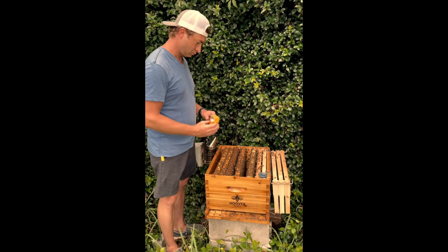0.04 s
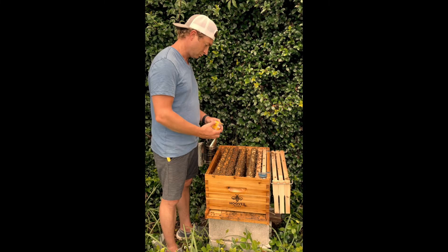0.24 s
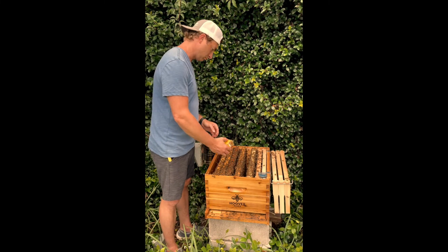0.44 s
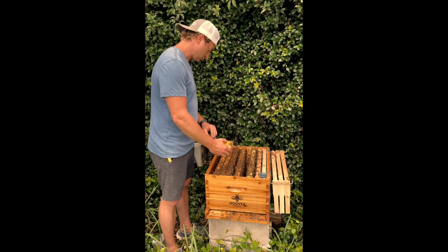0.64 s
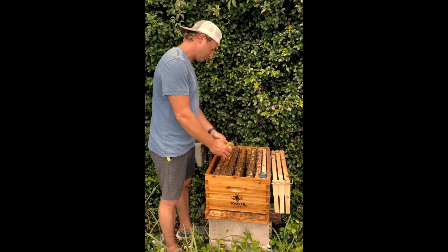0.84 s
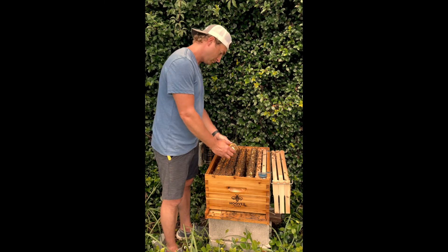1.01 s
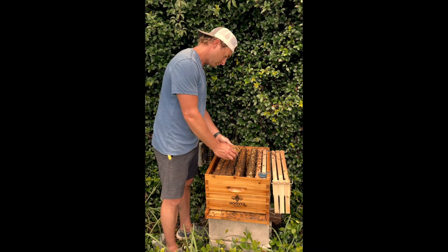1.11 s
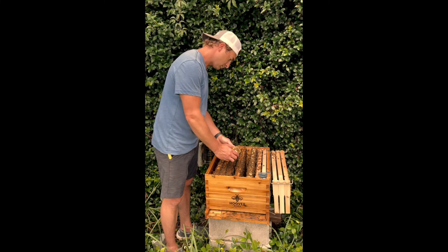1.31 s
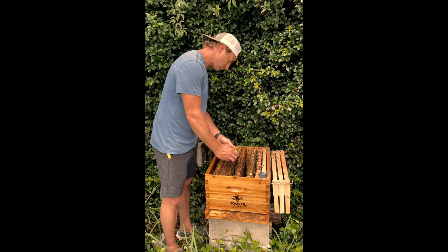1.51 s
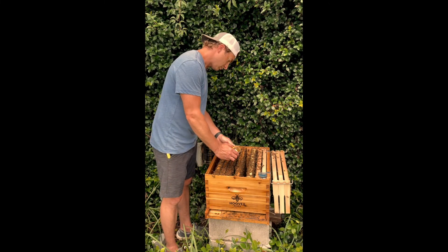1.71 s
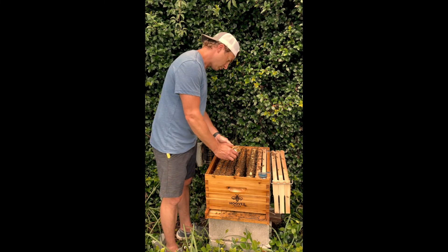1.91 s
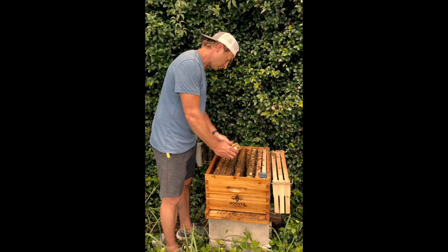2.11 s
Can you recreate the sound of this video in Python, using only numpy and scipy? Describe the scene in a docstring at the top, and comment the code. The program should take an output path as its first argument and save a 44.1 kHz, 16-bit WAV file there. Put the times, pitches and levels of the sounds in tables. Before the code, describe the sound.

Honeybees hum at an open hive in a quiet garden. One bee hovers close over the colony's dull murmur while wings rustle to the left. The hum fades under a few soft wooden knocks.

```python
"""An open wooden beehive in a quiet garden. After two tiny ticks the hum of beating wings swells:
one bee hovers close, almost a pure tone, over the dull murmur of the colony's wing strokes.
Others buzz past, and wings rustle to the left in airy noise and papery flurries. The hum slowly
fades, and the wooden frames ring with a soft knock and a few fainter bumps."""
import sys
import numpy as np
from scipy import signal
from scipy.fft import rfft, irfft
from scipy.io import wavfile
from scipy.ndimage import uniform_filter1d

SR = 44100
rng = np.random.default_rng(int(sys.argv[2]) if len(sys.argv) > 2 else 0)


def unload_audio(sound):
    """Save the sound as a 16-bit wav file, at the path given as the first command line argument."""
    columns = np.transpose(np.atleast_2d(sound))
    # keep every value between -1 and 1, then stretch to whole-number steps
    steps = np.round(np.clip(columns, -1, 1) * 32767)
    wavfile.write(sys.argv[1], SR, steps.astype(np.int16))


N = 94815
TIME_S = np.arange(N) / SR
OCTAVES = np.log2(np.maximum(np.fft.rfftfreq(N, 1 / SR), 1))
LEFT_RIGHT = np.array([[1], [-1]])


def undb(db):
    """Decibels to gain."""
    return np.exp(np.asarray(db) * np.log(10) / 20)


def curve(table, column=1):
    """Automation: one column of a table, joined by straight lines in time."""
    rows = np.array(table, float)
    return np.interp(TIME_S, rows[:, 0], rows[:, column])


def walk(rate_hz):
    """Smooth random wandering with a spread of about 1."""
    hold = max(int(SR / rate_hz), 1)
    steps = np.repeat(rng.standard_normal(N // hold + 3), hold)
    start = rng.integers(hold)
    return 1.35 * uniform_filter1d(uniform_filter1d(steps, hold), hold)[start:start + N]


def colour(x, eq):
    """Apply an EQ curve that falls 40 dB an octave beyond its ends; rms 1."""
    hz, db = np.array(eq, float).T
    beyond = np.maximum(np.log2(hz[0]) - OCTAVES, 0) + np.maximum(OCTAVES - np.log2(hz[-1]), 0)
    shaped = irfft(rfft(x) * undb(np.interp(OCTAVES, np.log2(hz), db) - 40 * beyond), N)
    return shaped / np.sqrt(np.mean(shaped ** 2))


def wide_noise(eq, likeness):
    """Coloured stereo noise; likeness is the share of power common to left and right."""
    centre = np.sqrt(likeness) * rng.standard_normal(N)
    sides = np.sqrt(1 - likeness) * rng.standard_normal((2, N))
    return colour(centre + sides, eq)


def tone(hz, harmonics, flutter_db, flutter_hz):
    """Harmonics of one beat rate, each fluttering in level."""
    phase = 2 * np.pi * np.cumsum(hz * np.ones(N)) / SR
    out = 0
    for multiple, db in harmonics:
        gain = undb(db + flutter_db * walk(flutter_hz))
        out = out + gain * np.sin(multiple * phase + 2 * np.pi * rng.random())
    return np.sqrt(2) * out


def ring(start_s, t60_s, rise_s):
    """Envelope of something struck: a short rise and a free decay."""
    age = np.maximum(TIME_S - start_s, 0)
    return np.minimum(age / rise_s, 1) * undb(-60 * np.maximum(age - rise_s, 0) / t60_s)


def split(x, hz):
    """Crossover: the parts below and above a frequency."""
    filters = [signal.butter(2, hz, side, fs=SR, output="sos") for side in ("low", "high")]
    return [signal.sosfilt(np.tile(sos, (2, 1)), x) for sos in filters]


# Tone of the garden bed: freq_hz, gain_db
GARDEN_EQ = [(250, -9.5), (600, 16.5), (1300, -8.5), (2100, -1), (2800, -5.5), (3700, -5.5), (4900, -24),
             (5700, -3.5), (8000, -14), (8700, -15), (13000, -45)]
# Rumble fading away: time_s, level_db
RUMBLE_LEVEL = [(0, -67.5), (.26, -79.5), (.95, -81), (2.15, -99)]
# Its low end: freq_hz, gain_db
RUMBLE_EQ = [(25, -21), (80, -11.5), (160, -11), (300, -22)]
# Shrill that drops out as the hum swells: time_s, level_db
SHRILL_LEVEL = [(0, -78), (.12, -81.5), (.18, -84), (.21, -105)]
# Its narrow peak: freq_hz, gain_db
SHRILL_EQ = [(9500, -26), (10200, -10), (10500, -6), (11100, -1), (11700, -33), (12600, -36)]

def garden():
    """Outdoor ambience: a quiet steady bed, a faint rumble and a thin insect-like shrill."""
    bed = undb(-72.5) * wide_noise(GARDEN_EQ, likeness=0.77)
    rumble = undb(curve(RUMBLE_LEVEL)) * wide_noise(RUMBLE_EQ, likeness=0.98)
    shrill = undb(curve(SHRILL_LEVEL)) * wide_noise(SHRILL_EQ, likeness=0.23)
    return bed + rumble + shrill


# Colony fader, with an opening blip and a hush before the swell: time_s, gain_db
COLONY_LEVEL = [(0, -51.5), (.04, -82), (.185, -77.5), (.215, -57.5), (.255, -46.5), (.37, -56.5),
                (.415, -51), (.46, -51.5), (.7, -52.5), (1.0, -50), (1.12, -51), (1.24, -48.5),
                (1.36, -53.5), (1.41, -48), (1.445, -55.5), (1.475, -50.5), (1.525, -50), (1.55, -54),
                (1.72, -58.5), (1.78, -55.5), (1.83, -54.5), (1.925, -53.5), (1.95, -63.5), (2.15, -57.5)]
# Dull body of the murmur: freq_hz, gain_db
MURMUR_EQ = [(100, -44), (130, -16), (200, -5.5), (280, 5.5), (380, 2.5), (480, -2), (620, -5.5),
             (800, -12), (900, -25), (1150, -55)]
# Low drone under it, before its fade: harmonic, gain_db
DRONE_HARMONICS = [(2, -6.5), (4, -10.5), (5, -13)]
# Bass ride against the mids: time_s, gain_db
BASS_LEVEL = [(0, -37), (.25, -0.5), (.5, 6.5), (.9, 5), (1.55, -1), (1.75, -15)]
# Buzzy upper edge, coming in late: time_s, gain_db
TREBLE_LEVEL = [(.2, -37.5), (.52, -24), (1.3, -28.5), (2.15, -22)]
# Tone of that edge: freq_hz, gain_db
TREBLE_EQ = [(900, -0.5), (1200, -0.5), (1600, 8), (2500, -16)]

def colony(bees=20, wingbeat_hz=209.96, stroke_sharpness=58, drone_hz=113.7, drone_fade_db_per_s=2.5):
    """Many bees, each a train of wing strokes at its own wandering rate, blur into a murmur."""
    wings = 0
    for detune in np.linspace(-.5, .25, bees):
        hz = wingbeat_hz * np.exp(detune + .025 * walk(12))
        phase = 2 * np.pi * (np.cumsum(hz) / SR + rng.random())
        strokes = np.exp(stroke_sharpness * (np.cos(phase) - 1))
        wings = wings + undb(2.5 * walk(18)) * strokes
    wings = (wings - wings.mean()) * signal.windows.tukey(N, .01)
    drone_pitch = drone_hz * (1 + 0.00299 * walk(8.04))
    drone = tone(drone_pitch, DRONE_HARMONICS, flutter_db=3.0, flutter_hz=7.67)
    murmur = undb(1.5) * colour(wings, MURMUR_EQ)
    bass, mids = split(murmur + undb(-drone_fade_db_per_s * TIME_S) * drone, hz=234)
    treble = undb(curve(TREBLE_LEVEL)) * colour(wings, TREBLE_EQ)
    return undb(curve(COLONY_LEVEL)) * (mids + undb(curve(BASS_LEVEL)) * bass + treble)


# Tick cues: start_s, level_db
TICKS = [(0.0705, -60), (.1333, -53)]
# Their pings, against each cue's level: pitch_hz, first_tick_db, second_tick_db
TICK_RINGS = [(3800, -14, -8.5), (5460, -29, -1.5), (7520, 2, -15), (10550, -4, -0.5), (12000, -35, -10)]
# Bright snap of the attack: freq_hz, gain_db
SNAP_EQ = [(2000, -11), (6000, 8), (11500, -9), (13000, -35)]

def ticks(snap_db=-8, tail_db=-10):
    """Tiny bright ticks: a broad snap and a few short pings, each with a faint scattered tail."""
    out = 0
    for which, (start, db) in enumerate(TICKS):
        blow = ring(start, t60_s=0.0062, rise_s=0.0015)
        tail = ring(start, t60_s=0.068, rise_s=0.0015)
        out = out + undb(db + snap_db) * blow * wide_noise(SNAP_EQ, likeness=0.7)
        for hz, *ring_db in TICK_RINGS:
            tail_eq = [(hz * .88, -40), (hz * .97, -3), (hz, 0), (hz * 1.03, -3), (hz * 1.1, -45)]
            scatter = undb(tail_db) * wide_noise(tail_eq, likeness=.5) * tail
            ping = np.sqrt(2) * np.sin(2 * np.pi * hz * TIME_S) * blow
            out = out + undb(db + ring_db[which]) * (ping + scatter)
    return out


def patchy(x, depth_db, rate_hz):
    """Let nine neighbouring bands flutter on their own."""
    centres = np.log2(np.geomspace(1700, 6500, 9))
    bands = [irfft(rfft(x) * np.interp(OCTAVES, centres, solo), N) for solo in np.eye(9)]
    return sum(band * undb(depth_db * walk(rate_hz)) for band in bands)


# Rustle fader and pan: time_s, level_db, left_minus_right_db
RUSTLE_LEVEL = [(0, -80, -2), (.19, -88, 5), (.218, -59, 7), (.3, -60.5, 5), (.55, -58.5, 2),
                (.8, -61, 1.5), (1.25, -61.5, 4), (1.43, -62, 7), (1.53, -58.5, 6.5), (1.72, -65, 7.5),
                (2.15, -69.5, 4.5)]
# Its hissy upper band: freq_hz, gain_db
HISS_EQ = [(2600, -8.5), (3100, -2), (3500, 4), (3900, 5), (4500, -1.5), (5150, -0.5), (5800, -6),
           (6400, -17), (8000, -42)]
# Its lower band, the body: freq_hz, gain_db
BODY_EQ = [(1250, -40.5), (1550, -8.5), (1850, 3), (2300, 4), (2650, -8)]
# Body ride against the hiss: time_s, gain_db
BODY_LEVEL = [(.2, -18), (.3, -9), (.8, -5), (1.35, -8.5), (2.15, -6.5)]
# Thin whine against the hiss: harmonic, gain_db
WHINE_HARMONICS = [(9, -24.5), (10, -16.5), (15, -22.5), (17, -31), (18, -16.5), (21, -20.5)]
# Air on top: freq_hz, gain_db
AIR_EQ = [(5200, -12), (6800, 11), (8500, 3.5), (11800, 0), (15500, 3)]
# Air fader: time_s, level_db
AIR_LEVEL = [(0, -120), (.19, -112), (.212, -74), (.56, -65), (.72, -72.5), (1.32, -74.5), (1.4, -70.5),
             (1.68, -71.5), (1.78, -78), (2.15, -83)]

def wing_rustle(whine_hz=235.04, flicker_db=1.55):
    """Wings rustle to the left: flickering noise around a steady whine, with faint unpanned air above."""
    hiss = wide_noise(HISS_EQ, likeness=0.33) * undb(flicker_db * walk(160))
    body = wide_noise(BODY_EQ, likeness=0.33) * undb(flicker_db * walk(160))
    rustle = patchy(hiss + undb(curve(BODY_LEVEL)) * body, depth_db=1.96, rate_hz=49)
    whine = tone(whine_hz, WHINE_HARMONICS, flutter_db=0, flutter_hz=8.7)
    pan = undb(LEFT_RIGHT * curve(RUSTLE_LEVEL, column=2) / 2)
    air = wide_noise(AIR_EQ, likeness=0.61) * undb(curve(AIR_LEVEL) + 1.76 * walk(90))
    return (rustle + whine) * undb(curve(RUSTLE_LEVEL)) * pan + air


# Wingbeat of the close bee: time_s, pitch_hz
BEE_PITCH = [(.2, 266), (.31, 258.2), (.45, 259.7), (.55, 262.1), (.68, 260.4), (1.3, 256.6)]
# Its swells and dips, before the trim: time_s, level_db
BEE_LEVEL = [(.18, -79), (.225, -48), (.258, -36.5), (.395, -36.5), (.435, -43), (.55, -35), (.67, -42),
             (.71, -54.5), (.755, -39), (.86, -39.5), (.96, -44), (1.04, -45.5), (1.1, -59), (1.2, -45.5),
             (1.36, -61), (1.52, -53.5), (1.7, -71)]
# Timbre of its wing stroke: harmonic, gain_db
BEE_HARMONICS = [(1, -0.5), (3, -31.5)]

def close_bee(waver=0.0038, trim_db=-1.45):
    """One bee hovers nearby, its wingbeat an almost pure tone."""
    hz = curve(BEE_PITCH) * (1 + waver * walk(24.97))
    return undb(curve(BEE_LEVEL) + trim_db) * tone(hz, BEE_HARMONICS, flutter_db=1.15, flutter_hz=51)


# Fly-bys: start_s, length_s, pitch_hz, level_db
FLY_BYS = [(0.209, 0.052, 803, -60.5), (0.268, 0.14, 453, -52.5), (0.465, 0.076, 785, -63),
           (1.13, 0.23, 422, -56.5)]

def passing_bees(sag=.018, waver=0.0092):
    """Single bees rise out of the murmur, each heard by one wavering overtone that sags in pitch."""
    out = 0
    for start, length, hz, db in FLY_BYS:
        progress = np.clip((TIME_S - start) / length, 0, 1)
        pitch = hz * (1 + sag * (.5 - progress) + waver * walk(31.1))
        swell = np.sqrt(4 * progress * (1 - progress))
        out = out + undb(db) * swell * tone(pitch, [(1, 0)], flutter_db=2.0, flutter_hz=53)
    return out


# Flurry cues: peak_s, length_s, centre_hz, level_db
FLURRIES = [(0.284, 0.13, 4650, -64.5), (0.588, 0.21, 2200, -64), (1.514, 0.026, 2380, -61)]

def wing_flurries(wingbeat_hz=235.04, pulse_depth=0.66, left_minus_right_db=1.5):
    """Short flurries of wings: a papery band of noise that pulses with the wingbeat."""
    out = 0
    for peak, length, hz, db in FLURRIES:
        beat_hz = wingbeat_hz * (1 + 0.039 * walk(34))
        pulse = 1 + pulse_depth * np.sin(2 * np.pi * np.cumsum(beat_hz) / SR)
        papery_eq = [(hz * .7, -24), (hz * .92, -3), (hz, 0), (hz * 1.08, -3), (hz * 1.35, -24)]
        swell = np.exp(-(2 * (TIME_S - peak) / length) ** 2)
        out = out + undb(db) * swell * pulse * wide_noise(papery_eq, likeness=.5)
    return out * undb(LEFT_RIGHT * left_minus_right_db / 2)


# Knocks on the frames: start_s, level_db
KNOCKS = [(1.299, -40.5), (1.463, -37.5), (1.613, -43), (1.795, -41), (1.828, -42), (1.864, -43),
          (1.899, -53), (2.041, -46)]
# Resonances of the wood: pitch_hz, gain_db, t60_s
WOOD_MODES = [(260, -6.5, 0.033), (336, 0, 0.019), (436, -2.5, 0.035), (546, -5, 0.028)]

def frame_knocks(detune=0.059, band_hz=(195, 950)):
    """Soft blows ring the low modes of the wooden frames, tuned a little differently each time."""
    out = 0
    for start, db in KNOCKS:
        for hz, mode_db, t60 in WOOD_MODES:
            pitch = hz * (1 + detune * rng.standard_normal())
            mode = np.sin(2 * np.pi * pitch * (TIME_S - start))
            out = out + undb(db + mode_db) * ring(start, t60, rise_s=0.0037) * mode
    return signal.sosfilt(signal.butter(4, band_hz, "band", fs=SR, output="sos"), out)


def widen(x, send_db=-30):
    """A faint, short diffuse copy of the highs adds slight stereo width to the hum and knocks."""
    impulse = rng.standard_normal(N) * ring(0, t60_s=.037, rise_s=0.0014)
    diffuse = signal.fftconvolve(x, impulse / np.sqrt(np.sum(impulse ** 2)))[:N]
    _, highs = split(diffuse, hz=1100)
    return x + LEFT_RIGHT * undb(send_db) * highs


def scene():
    """The hum and knocks in the middle; ticks, rustling wings and the garden spread around them."""
    centre = close_bee() + passing_bees() + colony() + frame_knocks()
    return widen(centre) + ticks() + wing_rustle() + wing_flurries() + garden()


def record(dry, cutoff_hz=15700):
    """A steep low-pass cuts the very top."""
    return signal.sosfilt(signal.ellip(10, .2, 80, cutoff_hz, fs=SR, output="sos"), dry)


dry = scene()
out = record(dry)
unload_audio(out)
```